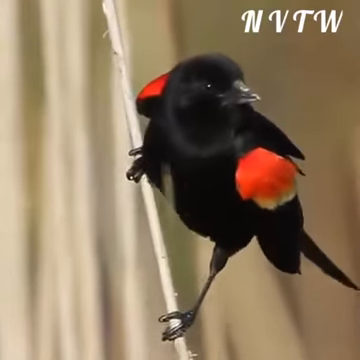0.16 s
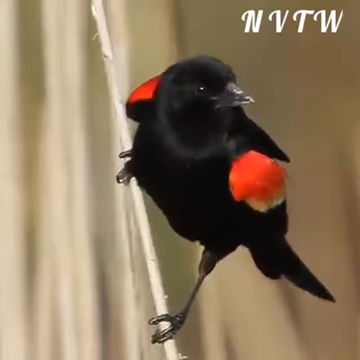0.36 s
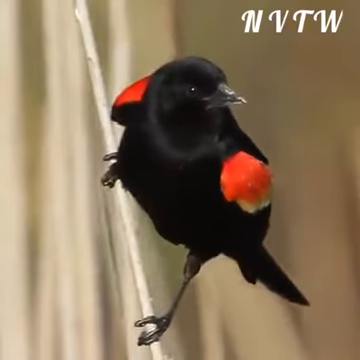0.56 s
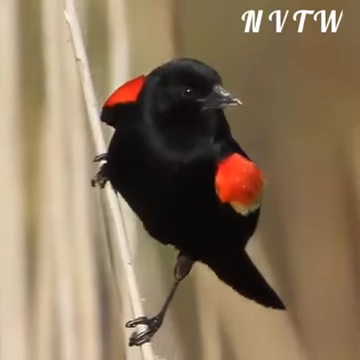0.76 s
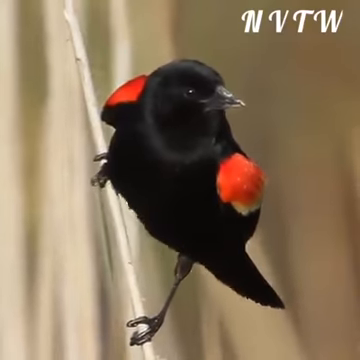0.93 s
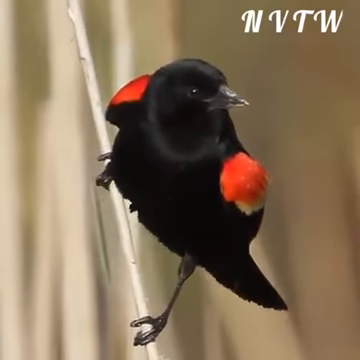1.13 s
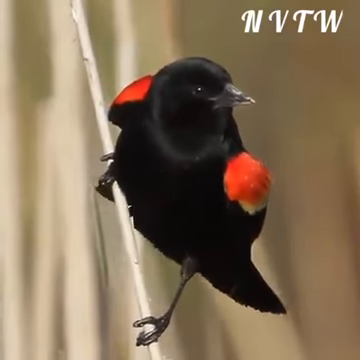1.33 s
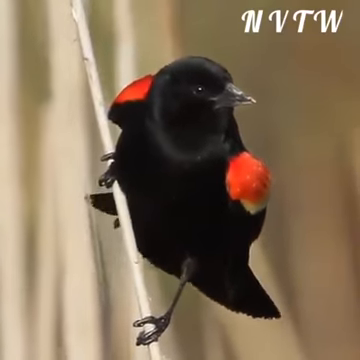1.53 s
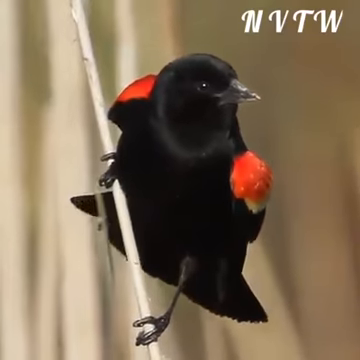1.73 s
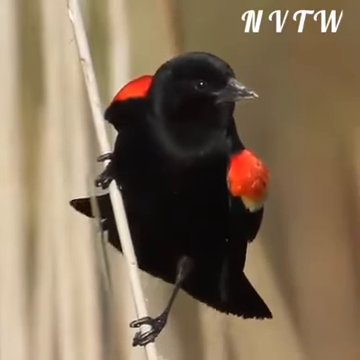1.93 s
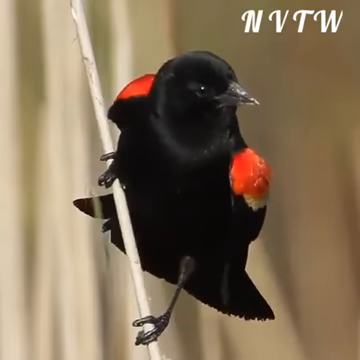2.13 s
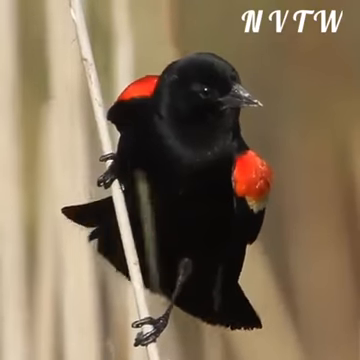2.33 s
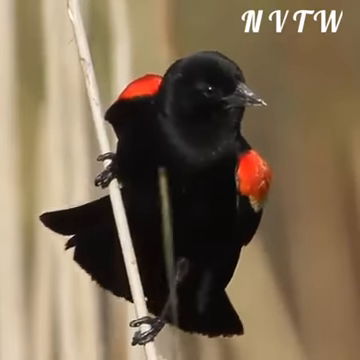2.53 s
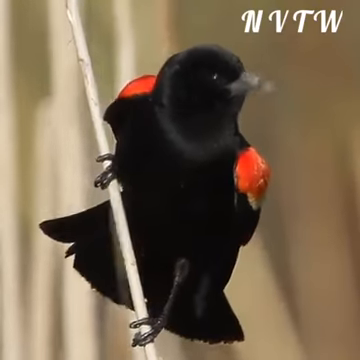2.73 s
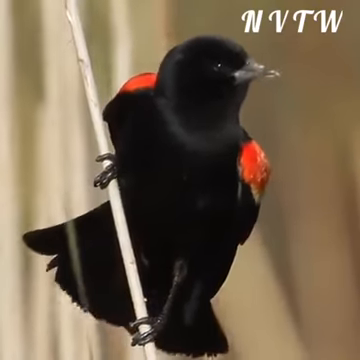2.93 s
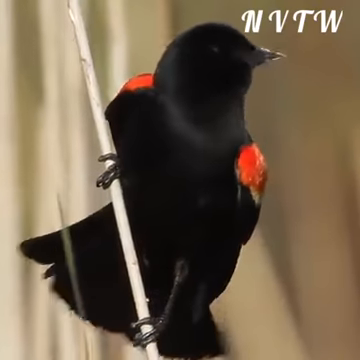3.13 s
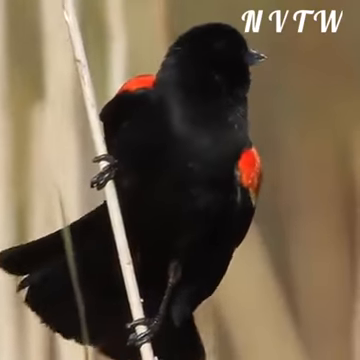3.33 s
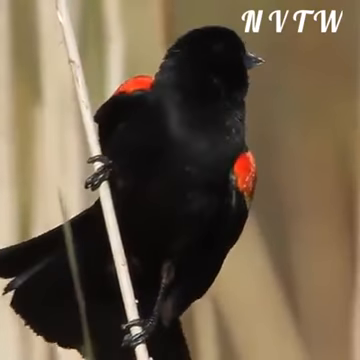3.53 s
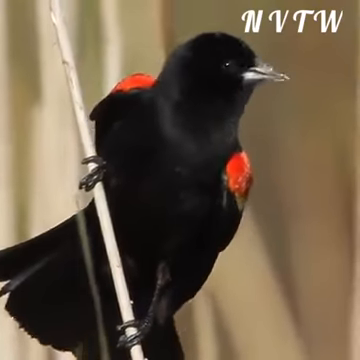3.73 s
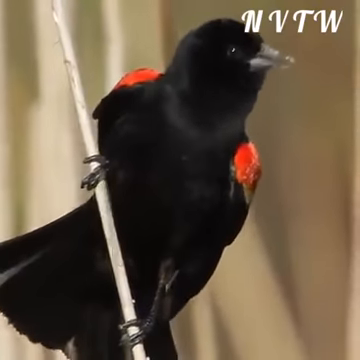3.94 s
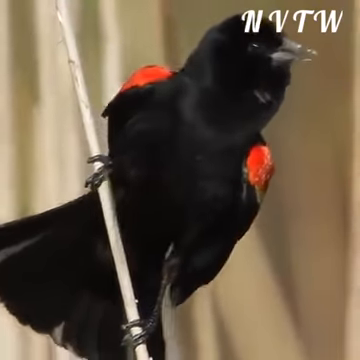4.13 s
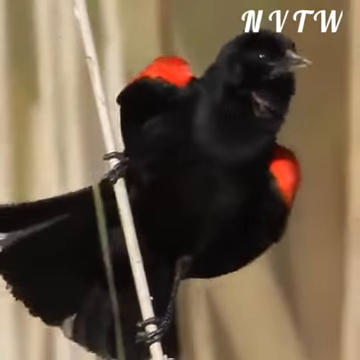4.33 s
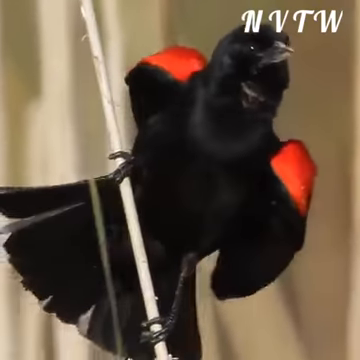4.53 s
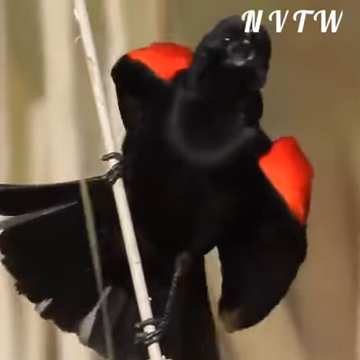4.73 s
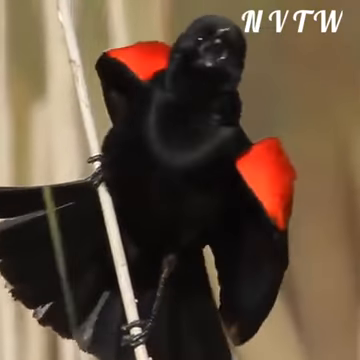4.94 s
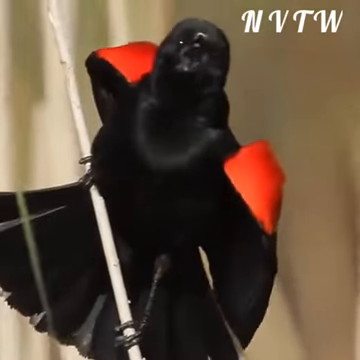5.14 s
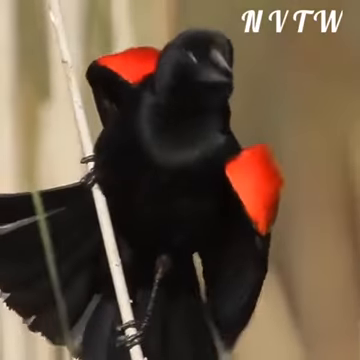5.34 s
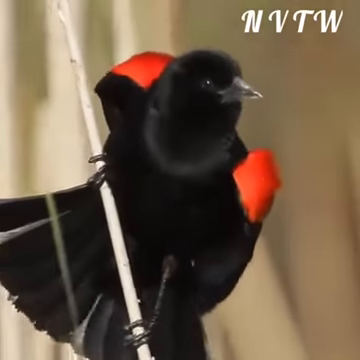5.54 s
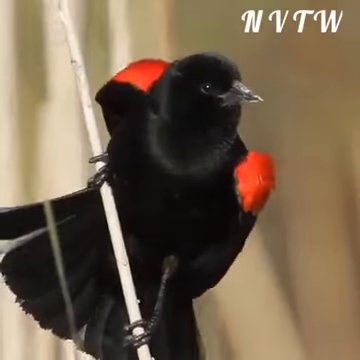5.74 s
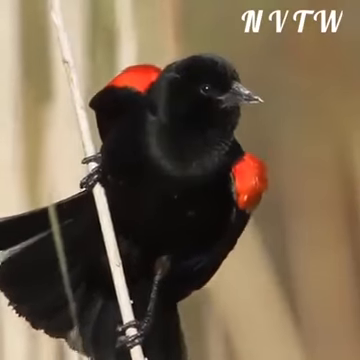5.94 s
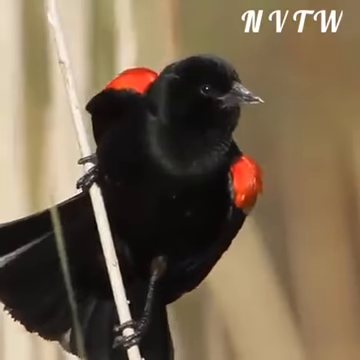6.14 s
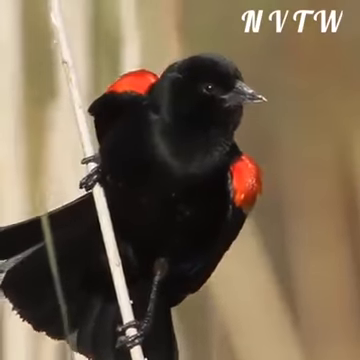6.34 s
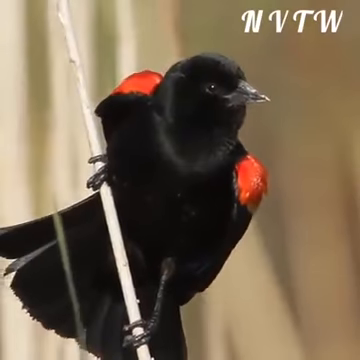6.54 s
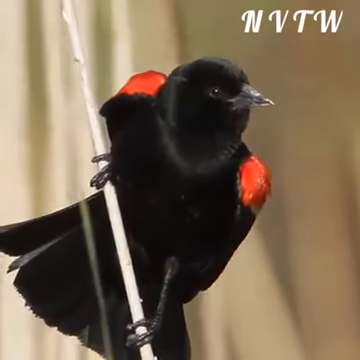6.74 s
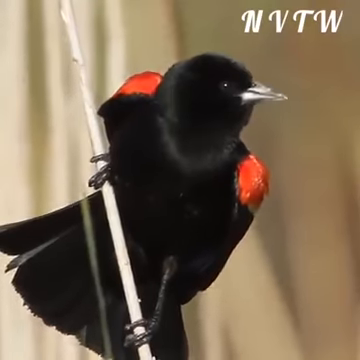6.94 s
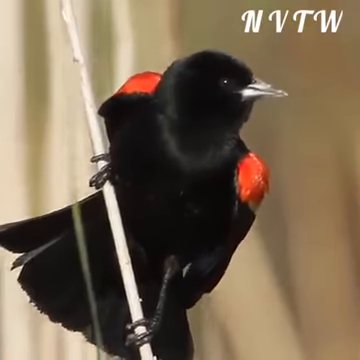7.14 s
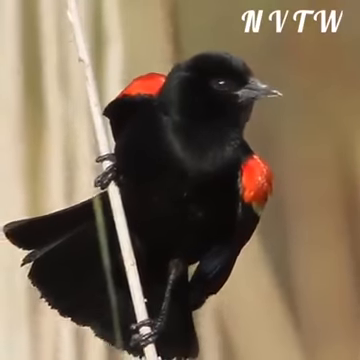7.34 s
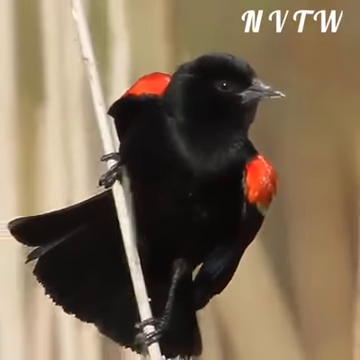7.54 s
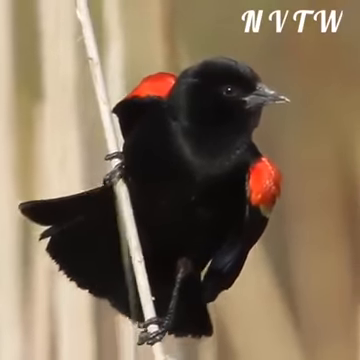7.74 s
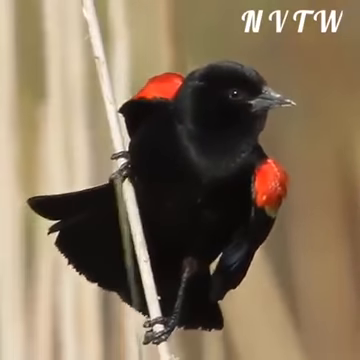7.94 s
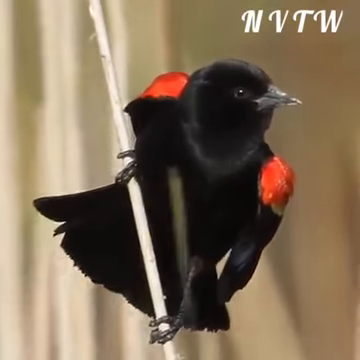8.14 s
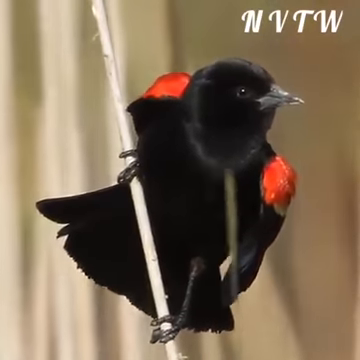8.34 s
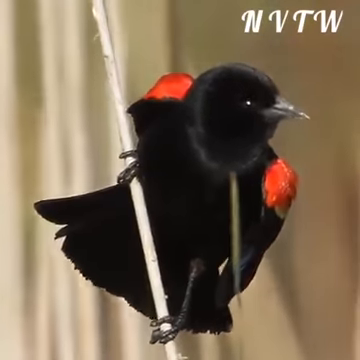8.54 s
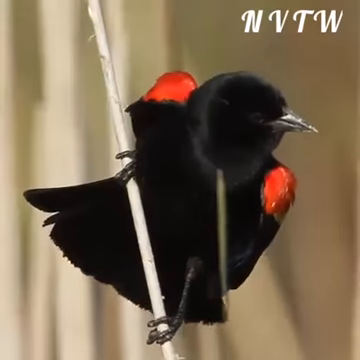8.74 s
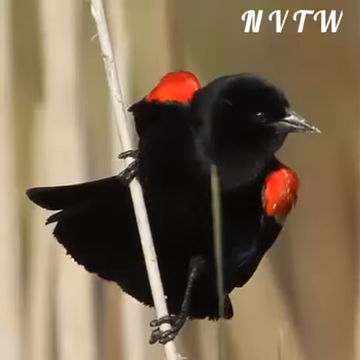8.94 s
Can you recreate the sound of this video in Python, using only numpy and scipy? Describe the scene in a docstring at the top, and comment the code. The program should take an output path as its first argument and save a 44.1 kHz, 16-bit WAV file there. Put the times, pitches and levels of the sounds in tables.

```python
"""Blackbird among the reeds

A red-winged blackbird sings close by: pure gliding sines, a rough upward break, then a buzz of paired notes and rasp.
Neighbours trill (one looped syllable plus hiss), whistle, chirp and squawk (sines bent along arcs, some shaken rough);
one bird gives a slowing run of reedy chips (harmonics through a throat). Noise tails scatter every call in the reeds.
Under it lie faint random twitters, a chorus and a rumble of shaped noise, and a far engine's wavering hum."""
import sys
import numpy as np
from scipy import signal
from scipy.fft import rfft, irfft, next_fast_len
from scipy.io import wavfile
from scipy.ndimage import map_coordinates

SR = 44100
rng = np.random.default_rng(int(sys.argv[2]) if len(sys.argv) > 2 else 0)


def to_wav(sig):
    """Store sig (one row per channel, or 1-D mono) as 16-bit WAV at the path in sys.argv[1].

    Samples outside -1..1 are clipped; the rate is SR.
    """
    pcm = np.clip(np.atleast_2d(sig), -1, 1) * 32767
    pcm = np.round(pcm).astype(np.int16)
    wavfile.write(sys.argv[1], SR, pcm.T)  # frames by channels


N = 400428  # length in samples

# Spectra below are hz, relative level_db; call levels are those before the final mix.
# background colours: hz, level_db
RUMBLE_SPECTRUM = [(20, -2.5), (65, -1.5), (97, -5), (111, -1.5), (130, -19), (278, -16), (700, -26.5),
                   (910, -64.5), (1540, -120)]
CHORUS_SPECTRUM = [(350, -59), (650, -16), (851, -8), (1210, -6), (2010, -12.5), (2270, -7), (2460, -7),
                   (2650, 0), (2900, -4), (3200, -3.5), (3680, -8), (4260, -2.5), (4560, -13), (5600, -11),
                   (6120, -23.5), (14800, -36)]
RUMBLE_DB, CHORUS_DB = -58.5, -55.5
# left-right likeness of the background: hz, correlation (0-1)
STEREO_LIKENESS = [(120, 1), (300, 0.81), (1000, 0.9), (3000, 0.79), (5000, 0.91), (8000, 0.057)]
# falling whistles: start_s, length_s, start_hz, end_hz, half_fall (share of length), peak_db
WHISTLES = [(0, .11, 2524, 2422, 0.396, -49.5), (0.178, .1, 3630, 3120, .55, -49),
            (1.367, 0.099, 3650, 2690, 0.3, -40), (1.637, 0.15, 4190, 3980, 0.12, -49.5),
            (2.451, 0.03, 4400, 3970, 0.384, -48), (2.849, 0.052, 4620, 3970, 0.29, -50),
            (8.637, 0.12, 4350, 2785, 0.64, -39.5), (9.002, 0.13, 4440, 3100, .58, -38)]
# decay of the scatter in the reeds: hz, t60_s
REED_DECAY = [(500, 0.2), (2200, 0.4), (5000, 0.18), (10000, 0.35)]
# arching chirps: start_s, length_s, top_hz, sung (share of the arch), peak_db, roughness (0-1)
CHIRPS = [(0.324, 0.043, 4290, 0.8, -49, 0.5), (0.431, 0.049, 4260, .9, -47.5, 0.4),
          (2.668, 0.053, 4390, 0.46, -47, 0.37), (3.016, 0.034, 4330, 0.5, -44, 0.54),
          (3.098, 0.031, 4360, .4, -49, 0.26), (3.728, 0.042, 4500, 0.56, -46, 0.4),
          (3.815, .048, 4950, 0.92, -39.5, 0.65), (3.905, 0.05, 5040, 0.94, -41.5, 0.7),
          (4, 0.052, 4800, 0.92, -42.5, 0.77), (4.182, .03, 4340, 1, -37.5, 0.2),
          (4.281, 0.055, 3740, 0.82, -45.5, 0.63), (8.544, 0.028, 4030, 0.7, -43, .2),
          (8.86, 0.032, 3900, 1, -40, 0.1), (8.918, .032, 4130, 0.88, -39.5, 0)]
# run of reedy chips: start_s, length_s, pitch_hz, bend (share of pitch), level_db
CHIPS = [(.715, 0.024, 1046, 0.072, -35), (0.784, .018, 1159, 0.054, -30.5),
         (0.872, 0.029, 1258, 0.12, -27.5), (0.954, 0.039, 1338, 0.07, -24),
         (1.049, 0.038, 1331, 0.07, -23.5), (1.157, 0.037, 1278, 0.061, -27),
         (1.28, 0.042, 1239, 0.062, -27), (1.406, 0.037, 1168, .04, -26.5),
         (1.541, 0.042, 1153, 0.037, -30.5), (1.683, 0.042, 1112, -0.038, -31.5),
         (1.828, 0.041, 1089, -0.02, -28), (1.985, 0.06, 1080, 0.025, -28),
         (2.186, 0.097, 1087, .11, -28.5), (2.503, .11, 1010, 0.11, -32)]
# the chipping bird's throat, then the noise in its chips: hz, level_db
CHIP_THROAT = [(1000, -3.5), (1350, -9.5), (2100, 2), (2700, 2), (3300, -9.5), (4000, -13), (4500, -37),
               (6300, -43), (7400, -38), (8500, -46), (9400, -33), (10500, -71)]
CHIP_SNAP = [(300, -3), (2500, 11), (4000, -9), (4700, -27), (9600, -13), (11000, -45.5)]
LONG_CHIP_S = 0.0551  # chips longer than this sag before they rise
# neighbours' squawks: start_s, length_s, pitch_hz, peak_db, roughness (0 = clear)
SQUAWKS = [(2.594, 0.028, 2620, -37, 0.85), (2.772, 0.063, 5990, -58, .8), (4.131, .055, 2317, -42, 0.24),
           (4.185, 0.044, 5160, -48, 0.73), (4.476, 0.028, 2490, -40, 0.31), (6.25, 0.033, 2035, -43, 0.78),
           (6.352, 0.0088, 5640, -44.5, 0.37), (6.442, 0.028, 3490, -35.5, 0.57),
           (7.32, 0.071, 1440, -40.5, 0.14), (7.484, 0.048, 2114, -37, 0.64),
           (7.6, 0.059, 3580, -34.5, 1.25), (7.649, .014, 2557, -26.5, 0.06),
           (7.664, .022, 2340, -36, 0.09)]
# neighbours' nearly level notes: start_s, length_s, pitch_hz, peak_db
FAR_NOTES = [(2.802, 0.043, 1510, -47.5), (3.007, 0.069, 3354, -42), (3.8, 0.12, 1595, -47.5),
             (3.825, 0.076, 3355, -43), (3.031, .12, 1654, -53.5), (4.143, 0.076, 1086, -48.5),
             (4.228, 0.19, 1749, -50.5), (4.256, 0.066, 1128, -49.5), (4.37, 0.11, 1658, -45),
             (4.376, 0.091, 1948, -43.5), (5.3, 0.086, 1182, -50), (5.314, .085, 5330, -38.5),
             (5.582, .07, 4150, -50.5), (5.922, .13, 1520, -37), (6.196, .12, 3893, -48.5),
             (6.305, 0.083, 1644, -49.5), (6.319, 0.068, 3270, -31.5), (6.914, 0.091, 1970, -49.5),
             (7.716, 0.15, 1660, -50.5), (8.165, 0.1, 3284, -33.5), (8.17, 0.082, 1636, -49)]
# loudness of four trills: time_s, tone_db, rasp_db (each shifted by its trill's offsets)
SLOW_LEVELS = [(2.98, -80, -52), (3.17, -48, -57), (3.22, -43, -58), (3.6, -44, -50), (3.83, -40, -48.5)]
FAST_LEVELS = [(6.3, -61, -51.5), (6.39, -45, -51.5), (6.45, -39.5, -44.5), (6.85, -41.5, -44.5),
               (7.02, -41, -51), (7.07, -45, -48), (7.32, -58.5, -55)]
TWO_NOTE_LEVELS = [(7.61, -45, -36.5), (7.66, -32.5, -39), (8.03, -32.5, -40.5), (8.17, -35, -43.5)]
FAINT_LEVELS = [(8.16, -44, -44), (8.35, -42.5, -45.5), (8.48, -41.5, -48.5), (8.53, -47, -37),
                (8.58, -49, -75)]
# speed of the trills: time_s, rate_hz (syllables a second)
SLOW_RATE = [(3.351, 31.57), (3.56, 21.54), (3.665, 32.7), (3.78, 21.83)]
FAST_RATE = [(6.47, 57.68), (6.6, 56.1), (6.759, 53.04)]
TWO_NOTE_RATE = [(7.771, 39.25), (7.87, 35.04), (8.17, 35.1)]
FAINT_RATE = [(8.16, 50.3)]
# one syllable of each trill: position (share of cycle), pitch_hz, relative level_db
SLOW_SYLLABLE = [(0, 2764, 9.5), (.13, 2760, 7), (.22, 3170, -3), (.4, 3140, -8), (.6, 3000, -18),
                 (.86, 2760, -1.5)]
FAST_SYLLABLE = [(0, 2713, 1.5), (.2, 2910, -6.5), (.4, 3318, -3), (.6, 3350, -13), (.82, 2830, -5.5)]
TWO_NOTE_SYLLABLE = [(0, 2660, 9), (0.099, 2692, 8), (.14, 3565, -6), (.25, 3342, 7.5), (.36, 3274, -5.5),
                     (.5, 3300, -15), (.78, 2616, -7.5), (.9, 2595, 6)]
FAINT_SYLLABLE = [(0, 2720, -3), (.35, 2690, -6), (.7, 2740, -7)]
# rasp of the neighbours' trills: hz, level_db
FAR_RASP = [(1800, -29.5), (2300, -19), (2600, -2), (3400, 9), (4400, -3.5), (5300, 8), (5850, -10.5),
            (6150, -61), (7100, -17.5), (9000, -54.5)]
# near bird's pure opening: start_s, length_s, pitch_hz, peak_db, attack_s, release_s
OPENING = [(4.521, 0.076, 1053, -29.5, 0.0035, 0.052), (4.602, 0.18, 1526, -16, 0.086, .0063),
           (4.778, 0.065, 792, -35.5, 0.026, 0.004)]
# air in the opening notes: hz, level_db
OPENING_AIR = [(1500, -22.5), (2700, -2), (3400, 0), (4700, -14), (5600, -11.5), (8200, -19), (9000, -43.5)]
# near bird's harsh break: start_s, length_s, pitch_hz, peak_db, roughness (0-1)
BREAK = [(4.848, 0.023, 1559, -24, 0.22), (4.849, 0.014, 1823, -25.5, .15), (4.872, 0.0096, 2440, -14, .15),
         (4.877, 0.016, 3800, -29.5, 1), (4.885, 0.011, 2580, -25, 0.01), (4.897, 0.038, 3420, -24.5, 0.4),
         (4.892, 0.032, 3920, -29.5, .15), (4.9008, 0.012, 3434, -13.5, 0.45),
         (4.936, .008, 2600, -21.5, .3), (4.949, 0.0085, 2576, -17, 0)]
# noise in the break: hz, level_db
BREAK_RASP = [(1500, -32.5), (2500, 4), (4200, 5), (4800, -14.5), (6200, -6.5), (8500, -26.5), (15000, -31)]
# near bird's buzz, before its dips: time_s, low_note_db, high_note_db, rasp_db
BUZZ_LEVELS = [(4.896, -46, -43, -33.5), (4.94, -22, -28, -32), (5.04, -27.5, -28.5, -34.5),
               (5.13, -22, -26.5, -32), (5.23, -21.5, -27.5, -32), (5.526, -23.5, -24.5, -33)]
# speed of the buzz: time_s, rate_hz (syllables a second)
BUZZ_RATE = [(4.97, 71.7), (5.02, 65.0), (5.15, 65.5), (5.2, 65.4)]
# low and high note of a buzz syllable: lead_s, length_s, pitch_hz, glide (share of pitch)
BUZZ_PAIR = [(0, .017, 2646, 0.0035), (.0056, .012, 3081, 0.023)]
# rasp of the buzz, then the narrow dips cut through the whole buzz: hz, level_db
BUZZ_RASP = [(600, -35), (1400, -13), (1800, 3), (1950, -20.5), (2090, -24.5), (2200, -0.5), (2450, 4.5),
             (2820, 4), (3300, 9), (3520, -5.5), (3630, -27.5), (3760, -29.5), (3900, 1), (4250, -4),
             (4450, -15), (5300, 0.5), (5850, 1), (6150, -31.5), (6800, -14.5), (8700, -51.5),
             (9800, -38.5), (11300, -60), (13200, -35), (15000, -45.5)]
BUZZ_DIPS = [(1900, 0), (2030, -14), (2170, 0), (3500, 0), (3680, -20), (3860, 0), (5900, 0), (6120, -14),
             (6600, 0)]
TOP_HZ = 14850  # band limit of the recorder


def amp(db):
    """Decibels to gain."""
    return 10 ** (np.asarray(db) / 20)


def unit(x):
    """x at rms 1."""
    return x / np.sqrt(np.mean(x ** 2) + 1e-20)


def along(points, hz):
    """(hz, value) points read on a log frequency axis."""
    f, v = np.transpose(points)
    return np.interp(np.log(hz + 1), np.log(f + 1), v)


def wobble(rate, size):
    """A smooth random curve, rate knots a second."""
    knots = rng.standard_normal(int(size * rate / SR) + 4)
    return map_coordinates(knots, [np.arange(size) * rate / SR])


def filtered(x, response):
    """x shaped by a response of frequency."""
    n = x.shape[-1]
    m = next_fast_len(n + 8192)
    return irfft(rfft(x, m) * response(np.fft.rfftfreq(m, 1 / SR)), m)[..., :n]


def noise(spectrum, size):
    """Coloured noise of rms 1."""
    return unit(filtered(rng.standard_normal(size), lambda hz: amp(along(spectrum, hz))))


def phase_of(hz):
    """Running phase of a moving frequency."""
    return 2 * np.pi * np.cumsum(hz) / SR


def gate(t, attack, release):
    """Opens at the first of the times t and closes at the last."""
    return np.clip((t - t[0]) / attack, 0, 1) * np.clip((t[-1] - t) / release, 0, 1)


def add(track, s, sound):
    """Mixes a sound into a track at time s."""
    part = track[max(round(s * SR), 0):][:len(sound)]
    part += sound[:len(part)]


def air(spectrum):
    """Stereo noise: shared mid and opposed side, balanced to the likeness wanted at each frequency."""
    def turn(hz):
        return np.arccos(np.clip(along(STEREO_LIKENESS, hz), -1, 1)) / 2
    mid = filtered(noise(spectrum, N), lambda hz: np.cos(turn(hz)))
    side = filtered(noise(spectrum, N), lambda hz: np.sin(turn(hz)))
    return unit(np.array([mid + side, mid - side]))


def marsh(hum_hz=97, hum_db=-67):
    """Distant birds blur into a swelling wash over a rumble and a far engine's hum."""
    swell_db = wobble(3, N) + 1.6 * wobble(10, N)
    chorus = air(CHORUS_SPECTRUM) * amp(CHORUS_DB + swell_db)
    hum_tone = unit(np.sin(phase_of(hum_hz + 1.67 * wobble(0.68, N))))
    hum = amp(hum_db + 0.75 * wobble(2.0, N)) * hum_tone
    return chorus + amp(RUMBLE_DB) * air(RUMBLE_SPECTRUM) + hum


def notes(rows, second_db, scatter_hz, flutter, swell):
    """Nearly pure notes that swell and fade along an arc of pitch; rough ones shake in pitch and strength."""
    out = np.zeros(N)
    for s, length, *path_hz, db, rough in rows:
        u = np.linspace(0, 1, int(length * SR))
        # a smooth curve through every point of the pitch path
        curve = np.polyfit(np.linspace(0, 1, len(path_hz)), path_hz, len(path_hz) - 1)
        phase = phase_of(np.polyval(curve, u) + rough * scatter_hz * wobble(1500, len(u)))
        tone = np.sin(phase) + amp(second_db) * np.sin(2 * phase)
        shaken = unit(tone * (1 + rough * flutter * wobble(800, len(u))))
        add(out, s, amp(db) * np.sin(np.pi * u) ** swell * shaken)
    return out


def whistles(rough=.04):
    """A whistle starts level, drops and levels off again; some drop early and trail a long tail."""
    rows = []
    u = np.linspace(0, 1, num=7)
    for s, length, high, low, turn, db in WHISTLES:
        warp = np.log(.5) / np.log(np.clip(turn, .05, .9))  # puts half the fall at turn
        fall = np.sin(np.pi / 2 * u ** warp) ** 2
        rows.append((s, length, *(high - fall * (high - low)), db, rough))
    return notes(rows, second_db=-53.5, scatter_hz=430, flutter=.64, swell=0.59)


def chatter(count, low_hz, high_hz, length, glide, db):
    """Rows of faint notes at random moments, each bending its own way."""
    when, pitch, span, size, first, last = rng.random((count, 6)).T
    hz = low_hz * (high_hz / low_hz) ** pitch
    ends = hz * (1 + glide * (np.array([first, last]) - .5))
    rough = np.full(count, .1)
    return np.column_stack([when * N / SR, length * (.5 + span), ends[0], hz, ends[1], db - 6 * size, rough])


def distant_voices():
    """Faint high twitters and low calls, scattered at random."""
    twitters = chatter(count=80, low_hz=2500, high_hz=4500, length=.05, glide=.15, db=-63)
    calls = chatter(count=36, low_hz=950, high_hz=2000, length=.06, glide=.12, db=-69)
    return notes(np.vstack([twitters, calls]), second_db=-40.5, scatter_hz=500, flutter=0.55, swell=0.48)


def reeds(x, delay=.006):
    """Stems scatter a thin tail, delayed in seconds, that reaches both microphones much alike."""
    hz, t, z = signal.stft(rng.standard_normal((2, SR // 2)), SR, nperseg=256)
    decay = amp(-60 * t / along(REED_DECAY, hz)[:, None])
    mid, side = signal.istft(z * decay, SR, nperseg=256)[1]
    tail = (mid + np.array([[.5], [-.5]]) * side) / np.linalg.norm(mid)
    late = np.pad(x, (int(delay * SR), 0))
    return signal.fftconvolve(late[None], tail, axes=1)[:, :N]


def chirps(depth=0.15):
    """Every chirp follows one pointed arch of pitch; those that stop at its top are heard as rising."""
    rows = []
    for s, length, hz, sung, db, rough in CHIRPS:
        arch = 1 - depth * np.cos(np.pi * np.linspace(0, sung, num=5)) ** 2
        rows.append((s, length, *(hz * arch), db, rough))
    return notes(rows, second_db=-42, scatter_hz=380, flutter=.6, swell=.5)


def chips(shimmer_db=2.0, attack=0.0028, release=0.0045, snap_db=-10, snap_decay=0.0021, breath_db=-33,
          swell_depth=0.57, scoop=0.063, scoop_s=.0014, catch=0.02, catch_s=0.0027):
    """Each chip catches roughly, clears and bends; the throat favours the second of its stacked harmonics."""
    out = np.zeros(N)
    k = np.arange(1, 11)[:, None]  # harmonic numbers
    for s, length, hz, rise, db in CHIPS:
        t = np.arange(int(length * SR)) / SR
        sag = np.clip(length - LONG_CHIP_S, 1 / SR, .028)  # seconds; next to nothing in short chips
        bend = np.interp(t, [0, sag, sag + .68 * (length - sag), length], [0.13, -0.57, 0.394, 0.28])
        shake = .012 + catch * np.exp(-t / catch_s)
        jitter = .004 * wobble(250, len(t)) + shake * wobble(1200, len(t))
        pitch = hz * (1 + rise * bend - scoop * np.exp(-t / scoop_s) + jitter)
        harmonics = amp(along(CHIP_THROAT, k * pitch)) * np.sin(k * phase_of(pitch))
        voice = unit(np.sum(harmonics, axis=0))
        snap = noise(CHIP_SNAP, len(t)) * (amp(snap_db) * np.exp(-t / snap_decay) + amp(breath_db))
        swell = unit(1 + swell_depth * np.sin(np.pi * t / length))  # air pressure peaks mid-chip
        level = gate(t, attack, release) * amp(db + shimmer_db * wobble(106, len(t)))
        add(out, s - attack / 2, (voice * swell + snap) * level)
    return out


def squawks():
    """Short notes shaken toward noise, the more so the rougher they are."""
    rows = [(s, length, hz, hz, hz, db, rough) for s, length, hz, db, rough in SQUAWKS]
    return notes(rows, second_db=-33.5, scatter_hz=480, flutter=0.87, swell=0.59)


def far_notes(rise=0.014, rough=0.019, clear_db=-35, blur=1.0):
    """The neighbours' pure notes creep upward; the fainter they arrive, the more they waver and blur."""
    rows = []
    for s, length, hz, db in FAR_NOTES:
        blurred = rough * amp(blur * (clear_db - db))
        rows.append((s, length, hz * (1 - rise), hz, hz * (1 + rise), db, blurred))
    return notes(rows, second_db=-50, scatter_hz=520, flutter=.9, swell=0.45)


def trill(levels, rates, syllable, rasp, scatter_hz, flutter, edge_hz, tone_db, rasp_db, rasp_pulsing,
          second_db=-24):
    """The syrinx runs one syllable's pitches and levels over and over, fast, with a rasp in each pulse."""
    s, loud, harsh = np.transpose(levels)
    t = np.arange(int(s[0] * SR), int(s[-1] * SR)) / SR
    cycle = np.cumsum(np.interp(t, *np.transpose(rates))) / SR
    share, hz, db = np.transpose(syllable)
    pulse = unit(amp(np.interp(cycle, share, db, period=1) + wobble(59.15, len(t))))
    phase = phase_of(np.interp(cycle, share, hz, period=1) + scatter_hz * wobble(1400, len(t)))
    tone = pulse * (np.sin(phase) + amp(second_db) * np.sin(2 * phase))
    tone = tone * (1 + flutter * wobble(1300, len(t)))
    # the throat passes little below its lowest resonance or above the rasp
    tone = unit(filtered(tone, lambda f: 1 / (1 + (edge_hz / (f + 1)) ** 24) / (1 + (f / 6000) ** 40)))
    hiss = noise(rasp, len(t)) * unit(pulse ** rasp_pulsing * amp(1.2 * wobble(45, len(t))))
    song = amp(np.interp(t, s, loud) + tone_db) * tone
    song = song + amp(np.interp(t, s, harsh) + rasp_db) * hiss
    out = np.zeros(N)
    add(out, s[0], song * gate(t, 0.0012, 0.005))
    return out


def opening(rise=0.021, scoop_hz=170, scoop_s=0.0041, fade_db=9, air_db=-31):
    """Pure notes scoop into pitch, swell, creep upward and fade ever faster, with a little air hissing along."""
    out = np.zeros(N)
    for s, length, hz, db, attack, release in OPENING:
        t = np.arange(int(length * SR)) / SR
        u = t / length
        phase = phase_of(hz * (1 + rise * (u - .5)) - scoop_hz * np.exp(-t / scoop_s))
        swell = np.sin(np.pi / 2 * gate(t, attack, release)) ** 2
        voice = unit(np.sin(phase)) + amp(air_db) * noise(OPENING_AIR, len(t))
        add(out, s, swell * amp(db - fade_db * u ** 4) * voice)
    return out


def harsh_break(rise=0.066, buzz_hz=300, buzz_depth=0.36, scatter_hz=200, rasp_db=-4, swell=0.73):
    """Short upward bursts; the rougher they are, the more they buzz and rasp."""
    out = np.zeros(N)
    for s, length, hz, db, rough in BREAK:
        u = np.linspace(0, 1, int(length * SR))
        phase = phase_of(hz * (1 + rise * (u - .5)) + rough * scatter_hz * wobble(1600, len(u)))
        pulsing = 1 + rough * buzz_depth * np.sin(2 * np.pi * buzz_hz * length * u)
        rasp = rough * amp(rasp_db) * noise(BREAK_RASP, len(u))
        voice = pulsing * (unit(np.sin(phase)) + rasp)
        add(out, s, amp(db) * np.sin(np.pi * u) ** swell * unit(voice))
    return out


def buzz(side_hz, side_db, second_db, scatter_hz=30, detune_hz=22, pulsing=.4, release=.045):
    """The syrinx's two sides take turns, afresh in each syllable; a rasp pulses with the high note, dying last."""
    s, low_db, high_db, rasp_db = np.transpose(BUZZ_LEVELS)
    t = np.arange(int(s[0] * SR), int((s[-1] + release) * SR)) / SR
    cycle = np.cumsum(np.interp(t, *np.transpose(BUZZ_RATE))) / SR
    last_beat = round(np.interp(s[-1], t, cycle))
    beats = np.interp(np.arange(1, last_beat + 1), cycle, t)  # syllable times, seconds
    out = np.zeros(N)
    for (lead, length, hz, glide), db in zip(BUZZ_PAIR, (low_db, high_db)):
        u = np.linspace(0, 1, int(length * SR))
        for beat in beats:
            pitch = hz * (1 + glide * (u - .5)) + detune_hz * rng.normal() + scatter_hz * wobble(900, len(u))
            phase = phase_of(pitch) + 2 * np.pi * rng.random()
            # a slower vibration of the syrinx puts side bands around each note
            shake = 1 + amp(side_db) * np.sin(phase_of(side_hz + scatter_hz * wobble(900, len(u))))
            tone = unit(shake * (np.sin(phase) + amp(second_db) * np.sin(2 * phase)))
            note = tone * np.sin(np.pi * u) ** 2
            add(out, beat - lead - length / 2, note * amp(np.interp(beat, s, db)))
    high_lead = BUZZ_PAIR[1][0]
    pulse = 1 + pulsing * np.cos(2 * np.pi * np.interp(t + high_lead, t, cycle))
    rasp = noise(BUZZ_RASP, len(t)) * pulse * amp(np.interp(t, s, rasp_db))
    add(out, s[0], rasp * gate(t, .002, release))
    return filtered(out, lambda hz: amp(along(BUZZ_DIPS, hz)))


def scene():
    """The near singer is almost dry; the farther the bird, the more of the reeds is heard."""
    far = whistles() + chirps() + squawks() + far_notes()
    distant = distant_voices()
    chipper = chips()
    trills = trill(SLOW_LEVELS, SLOW_RATE, SLOW_SYLLABLE, FAR_RASP, scatter_hz=92.1, flutter=0.094,
                   edge_hz=2750, tone_db=-5.5, rasp_db=2.0, rasp_pulsing=0.16)
    trills += trill(TWO_NOTE_LEVELS, TWO_NOTE_RATE, TWO_NOTE_SYLLABLE, FAR_RASP, scatter_hz=50, flutter=0.05,
                    edge_hz=2150, tone_db=-2.5, rasp_db=1.5, rasp_pulsing=0.081)
    blurred = trill(FAST_LEVELS, FAST_RATE, FAST_SYLLABLE, FAR_RASP, scatter_hz=55, flutter=.08,
                    edge_hz=2550, tone_db=-.5, rasp_db=1, rasp_pulsing=.55)
    blurred += trill(FAINT_LEVELS, FAINT_RATE, FAINT_SYLLABLE, FAR_RASP, scatter_hz=70.4, flutter=0.19,
                     edge_hz=2270, tone_db=-5.5, rasp_db=0.0, rasp_pulsing=.06)
    pure = opening()
    near = harsh_break() + buzz(side_hz=895, side_db=-15, second_db=-26.5)
    near_send = amp(-19.5) * pure + amp(-14.0) * near
    # the farthest voices reach the microphone mostly as scatter
    far_send = amp(-6.5) * far + amp(-12.5) * trills + amp(-9.0) * blurred + amp(12.5) * distant
    echoes = reeds(near_send) + reeds(far_send) + reeds(amp(-12.5) * chipper)
    pure_stereo = pure * amp([[.5], [-.5]])  # half a dB up on the left, half a dB down on the right
    return pure_stereo + near + far + trills + blurred + distant + chipper + echoes + marsh()


def record(dry):
    """The recorder keeps nothing above its band limit."""
    return filtered(dry, lambda hz: hz < TOP_HZ)


dry = scene()
out = record(dry)
to_wav(out)
```